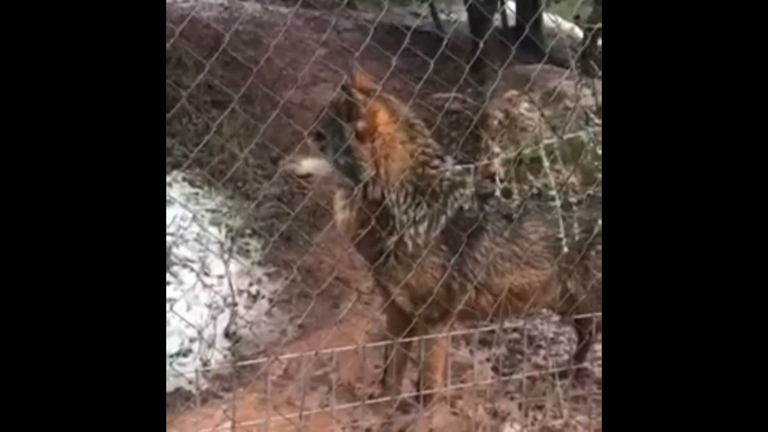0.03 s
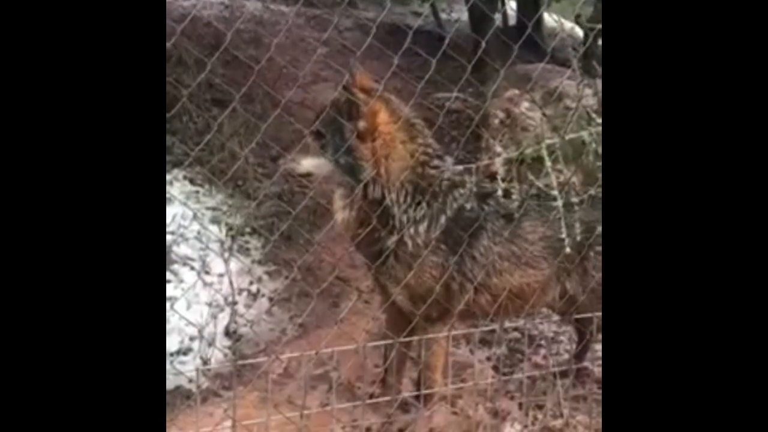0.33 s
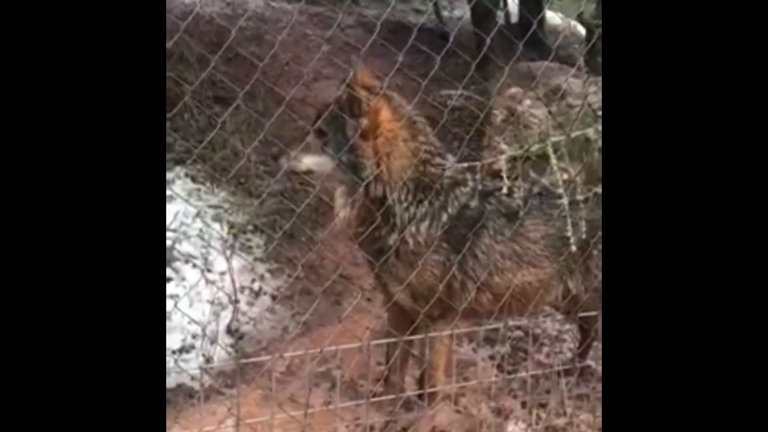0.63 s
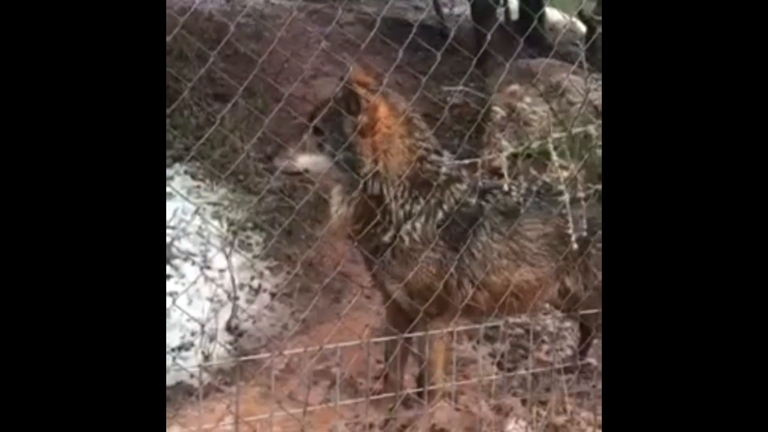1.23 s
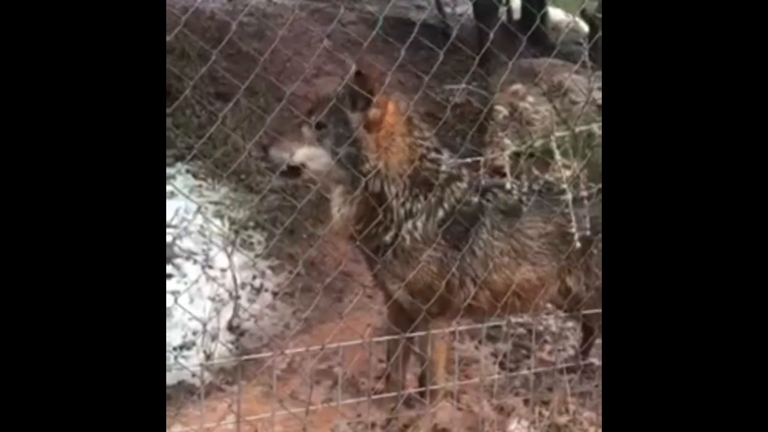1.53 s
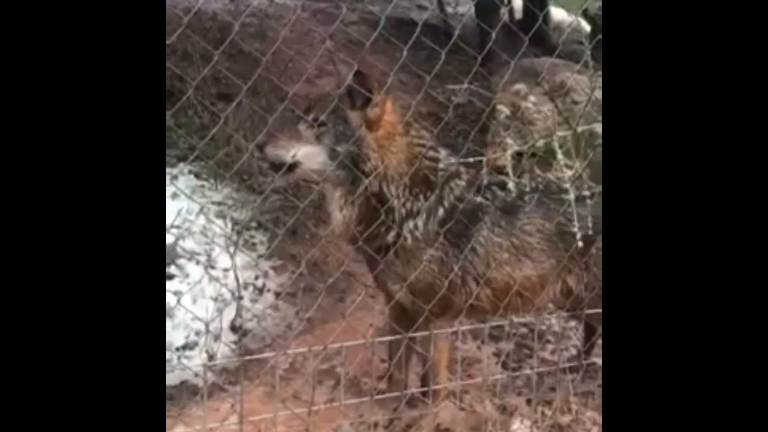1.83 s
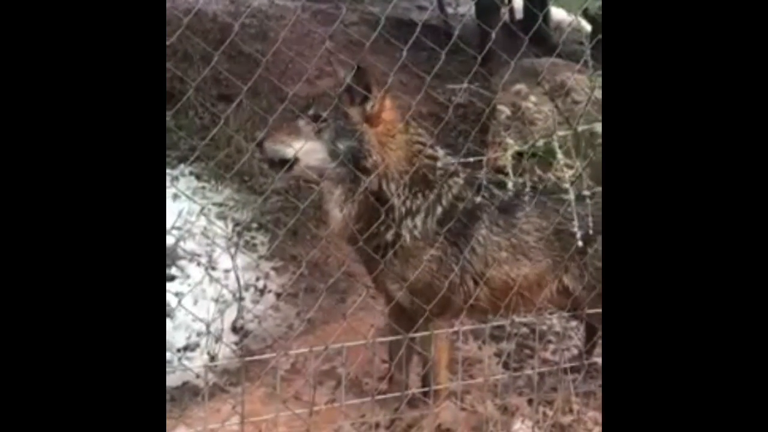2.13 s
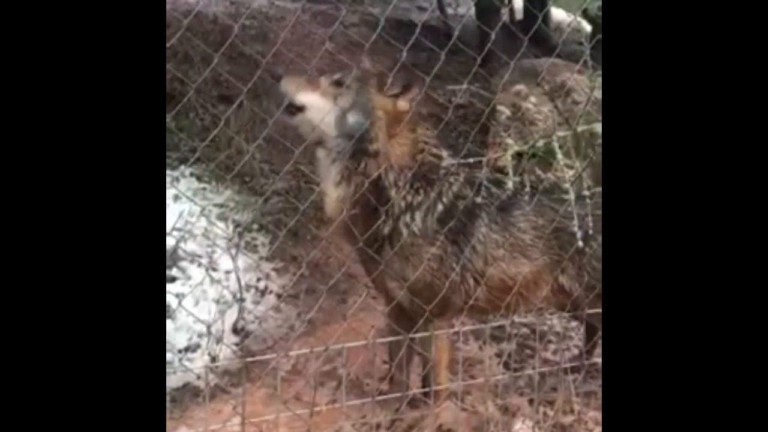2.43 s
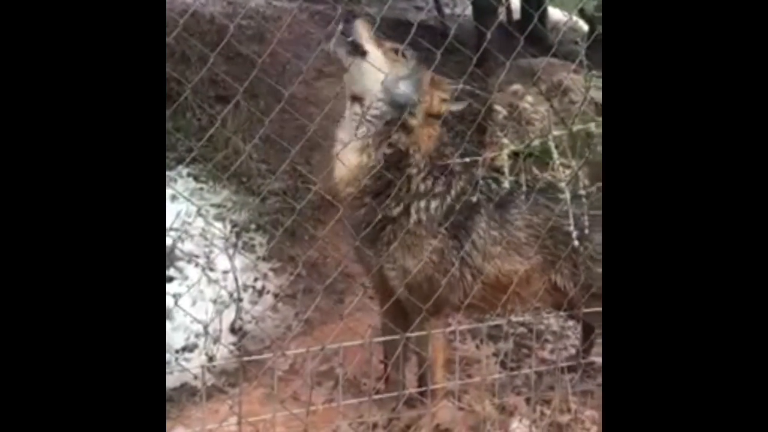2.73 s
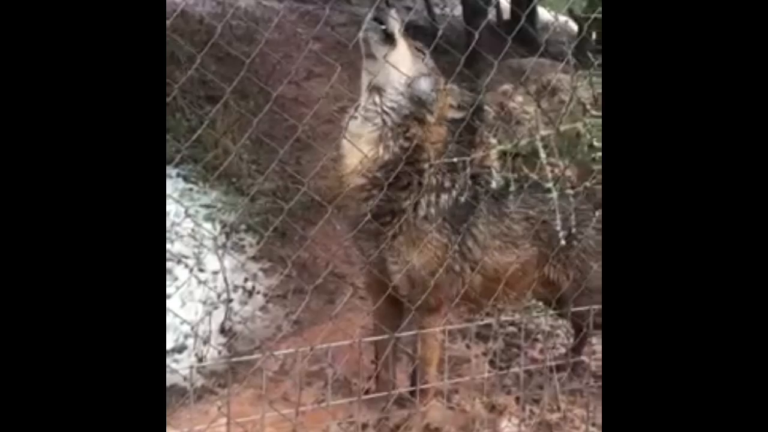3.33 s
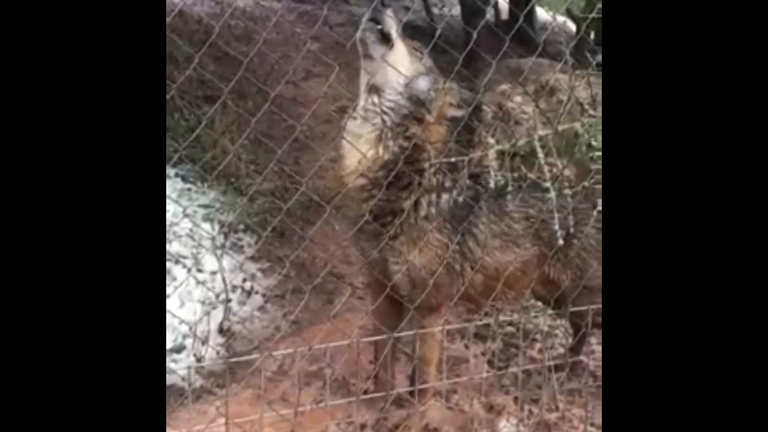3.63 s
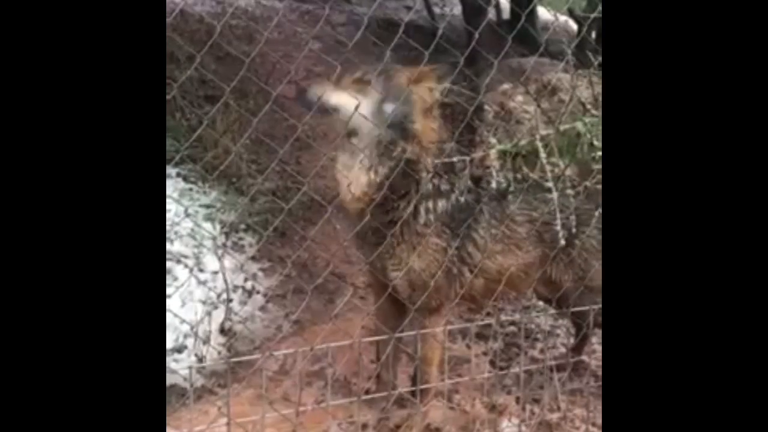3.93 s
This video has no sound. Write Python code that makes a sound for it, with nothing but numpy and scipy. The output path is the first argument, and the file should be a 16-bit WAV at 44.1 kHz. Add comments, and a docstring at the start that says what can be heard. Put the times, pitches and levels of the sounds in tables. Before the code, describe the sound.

One long, clear wolf howl outdoors, followed by a softer, wavering howl that falls away.

```python
"""A gruff swoop rises into a long clean howl: a wolf behind a wire fence, lifting its muzzle as the
pitch sags. A second wolf joins, is left alone, breaks into a fast flutter and slides down to a moan.
Each voice is a source and a filter: vocal folds make harmonics, and throat resonances weight them.
Faint moans come from further off, dry litter ticks and low thumps bump the microphone.
An earth bank and trees scatter a short echo over the wind's rumble and the hush of the open air."""
import sys
import numpy as np
from scipy import signal
from scipy.fft import rfft, irfft
from scipy.io import wavfile
from scipy.ndimage import uniform_filter1d

SR = 44100
rng = np.random.default_rng(int(sys.argv[2]) if len(sys.argv) > 2 else 0)


def unload_audio(sound):
    """Save the sound as a 16-bit wav file, at the path given as the first command line argument."""
    columns = np.transpose(np.atleast_2d(sound))
    # keep every value between -1 and 1, then stretch to whole-number steps
    steps = np.round(np.clip(columns, -1, 1) * 32767)
    wavfile.write(sys.argv[1], SR, steps.astype(np.int16))


N = 176400
T = np.arange(N) / SR
BINS_HZ = np.arange(N // 2 + 1) * SR / N
TOP_HZ = 12200


# First wolf's melody: time_s, pitch_hz
LEAD_PITCH = [(0, 216.3), (.05, 244), (.075, 317), (.11, 391), (.15, 477), (.2, 519), (.255, 550.5),
              (.31, 561.5), (.42, 573.7), (.68, 571), (1, 554), (1.5, 529.3), (1.56, 522.8), (2.05, 516),
              (2.28, 507.6), (2.74, 504.1), (2.785, 495.4), (2.825, 458), (2.86, 400), (2.92, 360)]
# Strength of its harmonics: time_s, fundamental_db, overtone_gain_db
LEAD_LEVEL = [(0, -26, -21), (.06, -23.5, -24), (.11, -18, -23.5), (.14, -22.5, -14.5),
              (.185, -15.5, -17.5), (.25, -15.5, -21), (.41, -11.5, -15.5), (.7, -13, -14), (1, -16, -15),
              (1.48, -16, -15), (1.62, -16, -15.5), (2.1, -16.5, -14.5), (2.75, -16.5, -14),
              (2.81, -21.5, -17), (2.85, -34, -32.5), (2.92, -54, -78.5)]
# Irregular vibration in its gruff start: time_s, jitter_share_of_pitch
GRUFF_JITTER = [(0, 0.011), (.045, 0.0041), (.06, 0.051), (.08, 0.0025), (.13, 0.012), (.19, 0.0015)]
# Spectrum of its rushing breath: frequency_hz, relative_db
BREATH_SPECTRUM = [(250, -31), (550, 23.5), (850, -17), (1500, 8), (2200, -10), (2650, -33.5), (3300, -4),
                   (3900, -13.5), (4900, -26.5), (6400, -6), (8000, -7.5), (9500, -13.5), (12000, -19)]

def lead_wolf():
    """Source and filter: the folds settle from rough to periodic vibration; air rushes once a cycle."""
    hz, = curve(LEAD_PITCH)
    base_db, overtone_db = curve(LEAD_LEVEL)
    jitter, = curve(GRUFF_JITTER)
    gruff = 1 - ramp(0.15, 0.27)
    hz = hz * (1 + 0.0016 * walk(14))
    phase = cycle(hz * (1 + (0.00022 + jitter) * walk(300)))
    upper = overtones(hz, phase, lambda f, at: lead_throat(f, at, gruff), orders=range(2, 34))
    upper *= undb(overtone_db + 0.42 * walk(25))
    breath = noise(BREATH_SPECTRUM) * (1 + 0.2 * np.cos(phase))
    breath *= undb(-51 + base_db - base_db.max() + 7 * gruff + walk(36))
    return undb(base_db) * partial(phase) + upper + breath


# Throat resonances in the clean howl: centre_hz, half_width_hz, muzzle_level_db, muzzle_raised_db
HOWL_RESONANCES = [(1110, 210, -13.5, -16.5), (1526, 183, -8, -9), (2173, 175, -19.5, -26),
                   (3165, 86, -27, -40), (3466, 200, -56.5, -54.5), (4442, 130, -43.5, -77.5),
                   (5115, 110, -54, -37), (5524, 290, -43.5, -59), (6080, 340, -54.5, -41.5),
                   (6570, 380, -34.5, -53.5), (7803, 310, -41, -49.5), (8596, 100, -43.5, -78.5),
                   (9860, 130, -55.5, -62), (10770, 280, -52.5, -57.5), (11900, 200, -58, -67)]
# Throat resonances in the gruff start: centre_hz, half_width_hz, gain_db
GRUFF_RESONANCES = [(640, 155, -1), (1278, 130, -8), (2060, 82, -16.5), (1950, 280, -31),
                    (3300, 110, -29.5), (6150, 470, -42), (8400, 300, -43)]

def lead_throat(hz, at, gruff):
    """Formants follow the throat's shape: its gain at samples `at` shifts as the muzzle lifts."""
    lift = ramp(1.13, 3.03)[at]
    howl = [(centre, width, level_db + (raised_db - level_db) * lift)
            for centre, width, level_db, raised_db in HOWL_RESONANCES]
    # The resonance near 2 kHz starts higher and weaker, then sinks into place.
    shift_hz = 425 * (1 - ramp(0.017, 0.11)[at])
    start = list(GRUFF_RESONANCES)
    centre, width, db = start[2]
    start[2] = (centre + shift_hz, width, db - 0.012 * shift_hz)
    return formants(hz, howl) * (1 - gruff[at]) + formants(hz, start) * gruff[at]


# Second wolf's melody: time_s, pitch_hz, flutter_share_of_pitch
SECOND_PITCH = [(2.42, 446, 0), (2.52, 484, 0.026), (2.7, 473.7, 0.0058), (2.92, 489.8, 0.016),
                (3.04, 474, 0.012), (3.17, 479, 0.01), (3.27, 456, 0.025), (3.43, 445.2, 0.035),
                (3.49, 410.2, .25), (3.615, 403.5, 0.27), (3.632, 398, 0), (3.648, 406, 0.266),
                (3.664, 383.6, 0.018), (3.676, 356.6, 0.041), (3.76, 337.7, 0.012), (3.835, 308.2, 0.011),
                (3.885, 257, 0.017), (3.92, 232, 0.0033), (4, 212.6, 0)]
# Strength of its harmonics: time_s, fundamental_db, octave_db, overtone_gain_db
SECOND_LEVEL = [(2.42, -57, -76.5, -98), (2.48, -34, -59, -79), (2.6, -42.5, -59.5, -69),
                (2.73, -38, -44, -70), (2.86, -35.5, -39.5, -61), (2.93, -33, -31.5, -52),
                (3.03, -28.5, -28, -53.5), (3.16, -28.5, -27.5, -52.5), (3.3, -27.5, -33.5, -53),
                (3.44, -26.5, -33.5, -54), (3.61, -27, -34.5, -49), (3.655, -28, -36, -48.5),
                (3.69, -20, -35.5, -48.5), (3.745, -31.5, -33.5, -53), (3.775, -18.5, -34, -54),
                (3.82, -22, -36.5, -55), (3.87, -38.5, -41, -58), (3.93, -45.5, -46, -58.5),
                (4, -48, -67, -90)]
# Its throat resonances: centre_hz, half_width_hz, gain_db
SECOND_RESONANCES = [(850, 410, -1), (1515, 260, -6), (3233, 86, -8.5), (4000, 90, -11), (4333, 72, -2.5),
                     (4518, 32, -1.5), (6080, 200, -17.5), (7200, 150, -18.5)]

def second_wolf(flutter_hz=72, quiver_hz=29.16, octave_cutoff_hz=1030):
    """Modulation: a second vibration in the throat kicks pitch and level up before a dull moan."""
    hz, depth = curve(SECOND_PITCH)
    base_db, octave_db, overtone_db = curve(SECOND_LEVEL)
    dull = ramp(3.59, 3.686)
    flutter_phase = cycle(flutter_hz * (1 + 0.07 * walk(60)))
    kick = abs(np.sin(flutter_phase / 2)) ** 6.6 * (1 + 0.18 * walk(70))  # one narrow pulse a cycle
    kick_swing = kick - kick.mean()
    quiver_phase = cycle(quiver_hz * (1 + 0.153 * walk(26)))
    quiver = 0.012 * (T > 3.2) * (1 - dull) * np.sin(quiver_phase)
    hz = hz * (1 + depth * kick + quiver + 0.0023 * walk(22))
    jitter = 0.0029 + 0.015 * depth
    phase = cycle(hz * (1 + jitter * walk(350)))

    def treble_loss(f, at):
        """A high shelf: harmonics above 2 kHz fade for the moan."""
        return undb(-13 * dull[at] * np.clip(f / 2000 - 1, 0, 1))

    upper = overtones(hz, phase, treble_loss, orders=range(3, 20)) * undb(overtone_db + 2 * walk(45))
    upper = colour(upper, formants(BINS_HZ, SECOND_RESONANCES))
    octave = undb(octave_db + 0.5 * walk(30) + 14 * depth * kick_swing) * partial(2 * phase)
    # The throat passes little just above its first resonance.
    octave = colour(octave, 1 / np.hypot(1, (BINS_HZ / octave_cutoff_hz) ** 20))
    swell = 1 + 0.35 * depth / depth.max() * kick_swing
    return undb(base_db + 0.22 * walk(30)) * swell * partial(phase) + octave + upper


# One long distant howl: time_s, pitch_hz, level_db
FAR_HOWL = [(.15, 366, -55), (.35, 409, -62), (.6, 406, -80.5), (.85, 396.7, -55.5), (1.1, 378, -72.5),
            (1.35, 362.5, -60), (1.6, 360.6, -75), (2.2, 347.5, -61), (2.45, 340, -67.5)]
# Three short distant moans, each with rows of: time_s, pitch_hz, level_db
FAR_MOANS = [
    [(.1, 259, -61.5), (.17, 241, -47.5), (.26, 229, -52), (.33, 362, -43.5), (.38, 404, -66)],
    [(.73, 287, -69), (.78, 324, -43.5), (.82, 285, -53), (.885, 220, -43), (.94, 274, -56),
     (1.03, 260, -51.5), (1.1, 239, -57.5), (1.16, 235, -71.5)],
    [(2.17, 259, -62.5), (2.24, 291, -55), (2.31, 310, -59.5), (2.39, 279.6, -63)],
]

def far_wolf(call):
    """Nearly simple harmonic motion: a distant call is a wavering fundamental and a weak octave."""
    hz, db = curve(call)
    phase = cycle(hz * (1 + 0.0064 * walk(30)))
    tone = partial(phase) + undb(-15) * partial(2 * phase)
    return gate(call) * undb(db + walk(12)) * tone


# Ticks of dry litter: start_s, level_db
LITTER_TICKS = [(2.495, -56), (3.055, -51), (3.589, -53), (3.62, -56), (3.824, -60), (3.97, -54)]
# Their spectrum: frequency_hz, relative_db
LITTER_SPECTRUM = [(800, -19.5), (2000, -3.5), (5000, -2), (9000, -1.5), (12000, -7)]

def litter(decay_s=0.009):
    """Damped transients: each dry tick is a burst of broadband noise that decays exponentially."""
    envelope = sum(undb(db) * (T > start) * np.exp(-abs(T - start) / decay_s)
                   for start, db in LITTER_TICKS)
    return noise(LITTER_SPECTRUM) * envelope


# Low thumps and bumps on the microphone: peak_time_s, centre_hz, peak_db
MIC_THUMPS = [(0.171, 65, -45), (0.319, 71, -54.5), (0.699, 70.9, -45), (.8, 55.3, -41), (1.145, 72, -40),
              (1.268, 90, -36.5), (1.44, 62.4, -33.5), (1.53, 81, -25.5), (1.616, 52.9, -34.5),
              (1.788, 60, -42), (1.989, 85.2, -38), (2.399, 55.2, -46.5), (2.5, 65.5, -41), (2.64, 70, -40),
              (2.734, 75, -36.5), (3.44, 96, -27), (3.48, 55.16, -33.5), (3.655, 55, -28),
              (3.745, 85, -29.5), (3.819, 45, -27), (3.875, 85, -14), (3.979, 44.8, -32)]

def mic_thumps(half_width_cycles=0.38):
    """Wave packets: each thump is a cycle or two of a low tone under a Gaussian envelope."""
    thumps = 0
    for peak_s, hz, db in MIC_THUMPS:
        cycles = (T - peak_s) * hz
        envelope = undb(db) * np.exp(-(cycles / half_width_cycles) ** 2)
        thumps += envelope * np.cos(2 * np.pi * cycles + rng.uniform(0, 2 * np.pi))
    return thumps


# Spectrum of the wind's rumble: frequency_hz, relative_db
WIND_SPECTRUM = [(20, -15.5), (42, 1.5), (70, 0), (120, -12), (200, -12.5), (400, -37), (1000, -69.5)]

def wind():
    """Random pressure fluctuations: a low rumble that swells and ebbs."""
    return noise(WIND_SPECTRUM) * undb(-54 + 4 * walk(11))


# Spectrum of the outdoor hush: frequency_hz, relative_db
OPEN_AIR_SPECTRUM = [(30, -6.5), (150, -10.5), (400, -3), (900, -2), (1800, -14.5), (3000, -19),
                     (6000, -22.5), (9000, -21.5), (12000, -31)]

def open_air():
    """Ambient noise: a faint, dark hush whose level wavers slightly."""
    return noise(OPEN_AIR_SPECTRUM) * undb(-55.5 + walk(6.2))


def with_echo(sound, t60_s=0.25, echo_db=-24):
    """Scattering: the earth bank and the trees add a short, dull tail to the direct sound."""
    tail = noise([(100, -7.5), (1500, 2.5), (10000, -7)]) * undb(-60 * T / t60_s) * ramp(0.005, 0.015)
    tail /= np.sqrt(np.sum(tail ** 2))
    return sound + undb(echo_db) * signal.fftconvolve(sound, tail)[:N]


def overtones(hz, phase, gain, orders):
    """Fourier synthesis: harmonics weighted by gain(frequency, samples); high ones shimmer most."""
    at = np.arange(0, N, 40)
    total = 0
    for k in orders:
        shimmer = undb(2.2 * min((k - 1) / 10, 1) * walk(8.99)[at])
        weight = shimmer * gain(k * hz[at], at) * (k * hz[at] < TOP_HZ)
        total += np.interp(T, T[at], weight) * np.cos(k * phase)
    return np.sqrt(2) * total


def formants(hz, resonances):
    """Resonance: the summed gain of steep-sided peaks at the given frequencies."""
    return sum(undb(db) / (1 + ((hz - centre) / width) ** 2 / 2) ** 2
               for centre, width, db in resonances)


def cycle(hz):
    """Phase in radians is the time integral of angular frequency."""
    return 2 * np.pi * np.cumsum(hz) / SR


def partial(phase):
    """A sinusoid of rms 1."""
    return np.sqrt(2) * np.sin(phase)


def noise(spectrum):
    """Spectral shaping: white noise takes on the given colour, at rms 1."""
    hz, db = np.array(spectrum, float).T
    gain = undb(np.interp(np.log(BINS_HZ + 1), np.log(hz), db))
    shaped = irfft(rfft(rng.standard_normal(N)) * gain, N)
    return shaped / shaped.std()


def colour(sound, gain):
    """Linear filtering: the spectrum is multiplied by a gain over frequency."""
    padded_gain = np.interp(np.arange(N + 1) / 2, np.arange(len(gain)), gain)
    return irfft(rfft(sound, 2 * N) * padded_gain, 2 * N)[:N]


def walk(rate_hz):
    """Smooth random fluctuation with a standard deviation of 1."""
    hold = max(int(SR / rate_hz), 1)
    steps = np.repeat(rng.standard_normal(N // hold + 1), hold)
    smooth = uniform_filter1d(uniform_filter1d(steps, hold), hold)[:N]
    return smooth / smooth.std()


def curve(rows):
    """Interpolation of each table column over time, with rounded corners."""
    times, *columns = np.array(rows, float).T
    return [uniform_filter1d(np.interp(T, times, col), size=500, mode="nearest") for col in columns]


def ramp(start_s, end_s):
    """A linear rise from 0 to 1."""
    return np.clip((T - start_s) / (end_s - start_s), 0, 1)


def gate(rows):
    """A soft-edged window, open from a table's first time to its last."""
    return uniform_filter1d(1.0 * (T > rows[0][0]) * (T < rows[-1][0]), size=900)


def undb(db):
    """Decibels to amplitude ratio."""
    return 10 ** (np.asarray(db) / 20)


def scene():
    """Superposition: near and far wolves, litter, thumps, wind and open air add in one channel."""
    near = lead_wolf() * (1 - ramp(2.86, 2.93)) + second_wolf() * gate(SECOND_LEVEL)
    pack = near + far_wolf(FAR_HOWL) + sum(far_wolf(moan) for moan in FAR_MOANS)
    return (with_echo(pack + litter()) + mic_thumps() + wind() + open_air())[None]


def record(dry):
    """Band limiting: a steep low-pass filter removes the highest treble."""
    return signal.sosfilt(signal.ellip(8, 0.2, 70, TOP_HZ, fs=SR, output="sos"), dry)


dry = scene()
out = record(dry)
unload_audio(out)
```